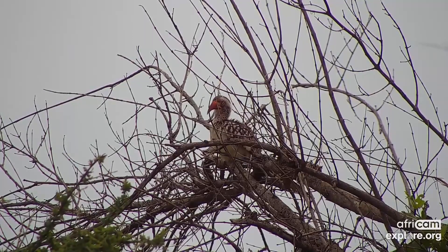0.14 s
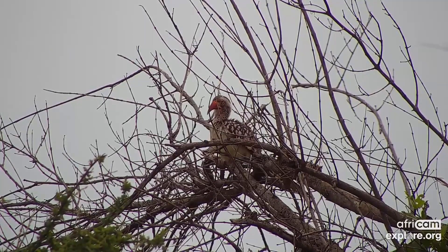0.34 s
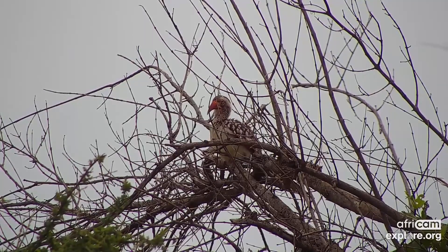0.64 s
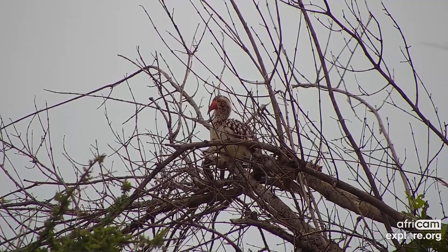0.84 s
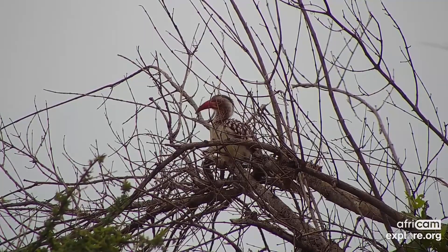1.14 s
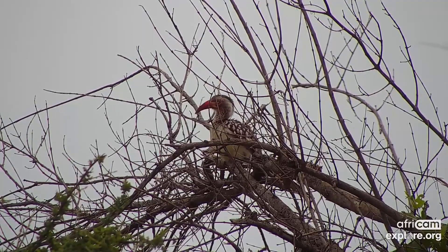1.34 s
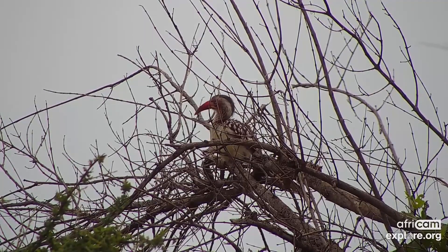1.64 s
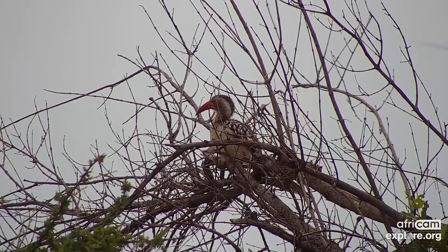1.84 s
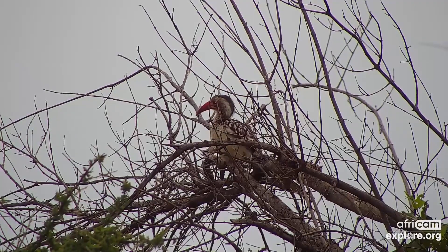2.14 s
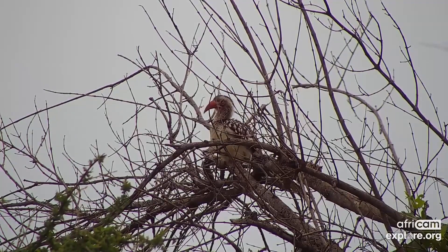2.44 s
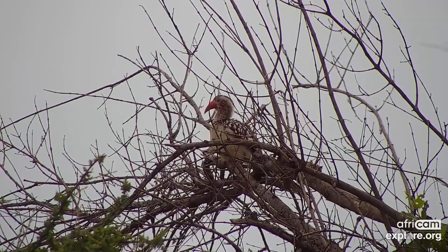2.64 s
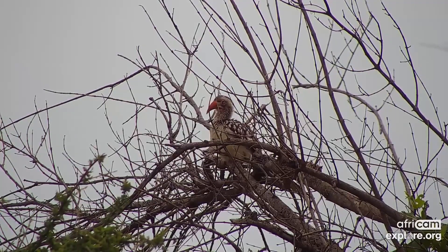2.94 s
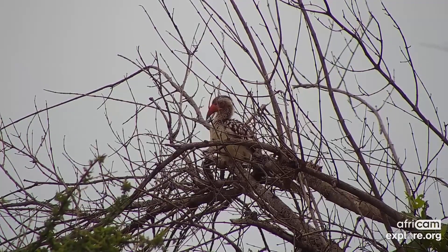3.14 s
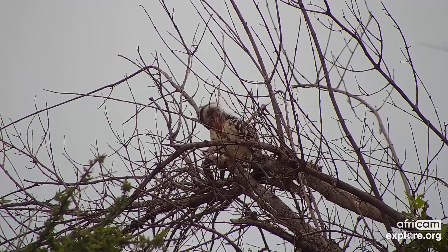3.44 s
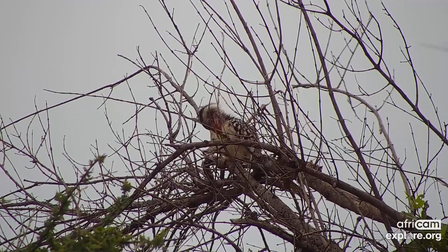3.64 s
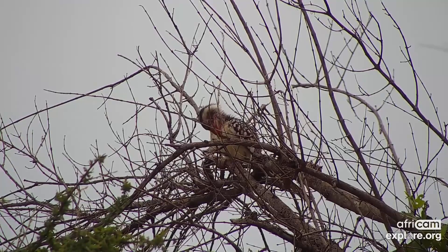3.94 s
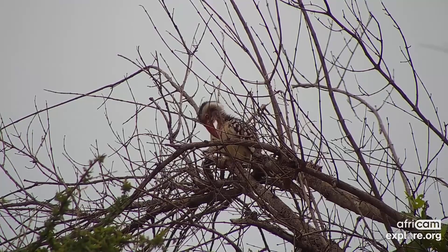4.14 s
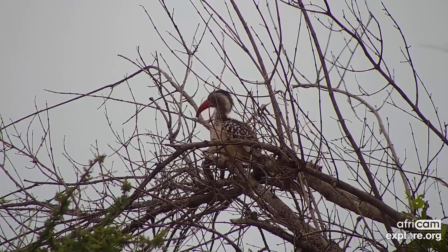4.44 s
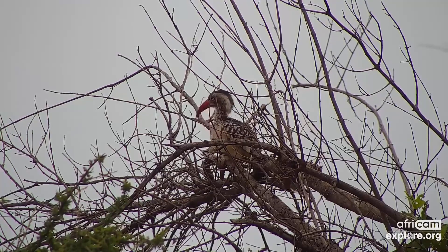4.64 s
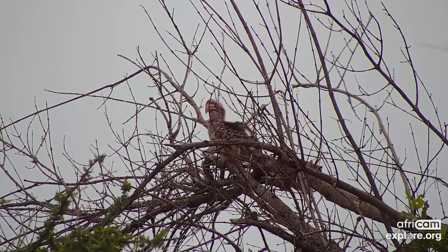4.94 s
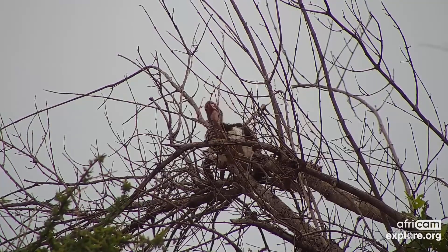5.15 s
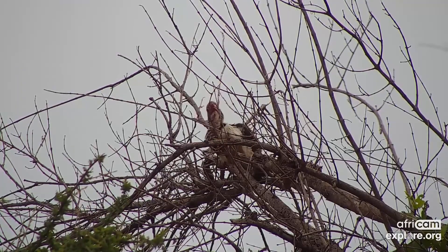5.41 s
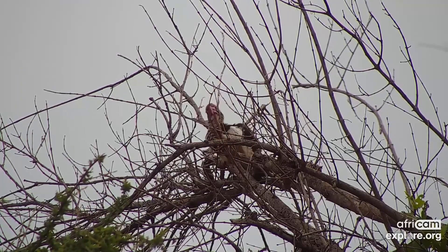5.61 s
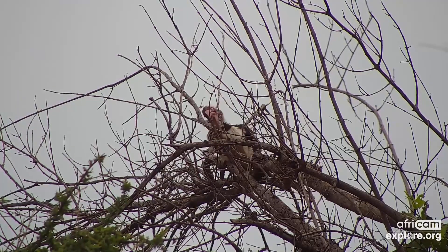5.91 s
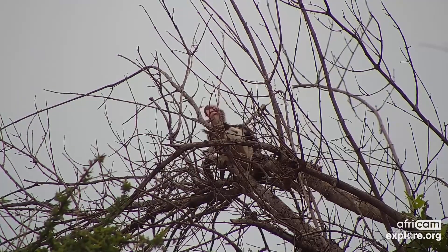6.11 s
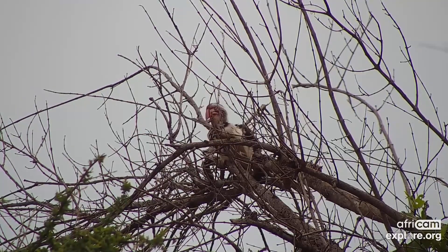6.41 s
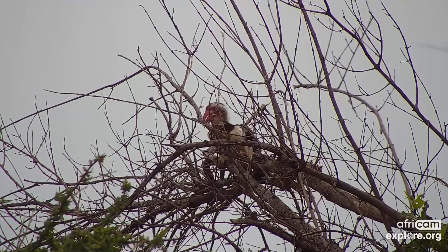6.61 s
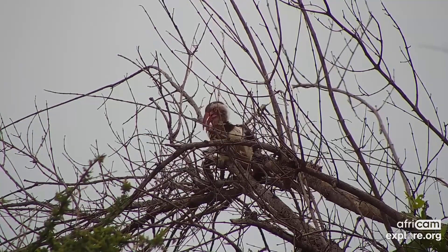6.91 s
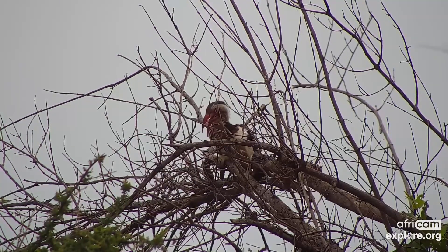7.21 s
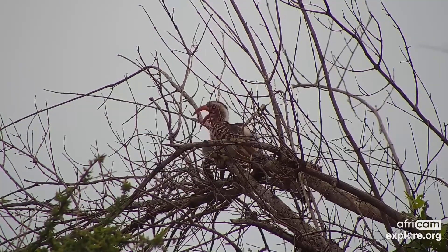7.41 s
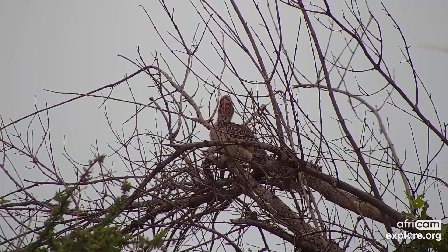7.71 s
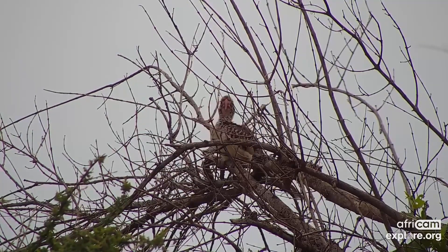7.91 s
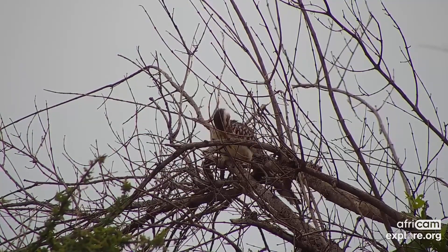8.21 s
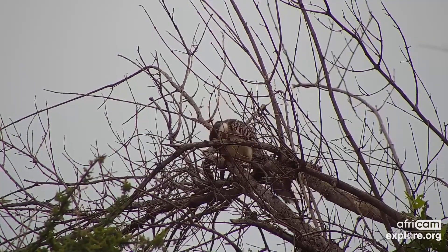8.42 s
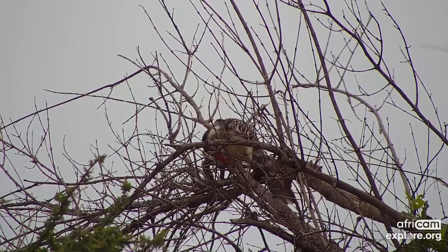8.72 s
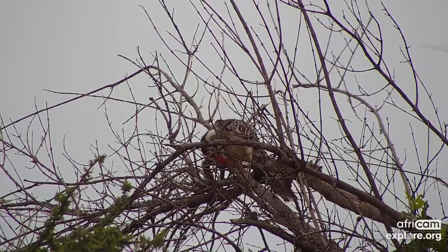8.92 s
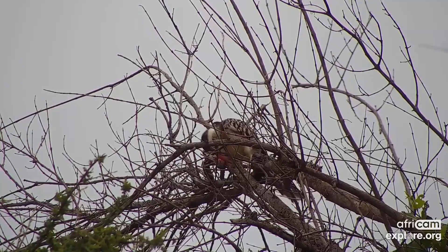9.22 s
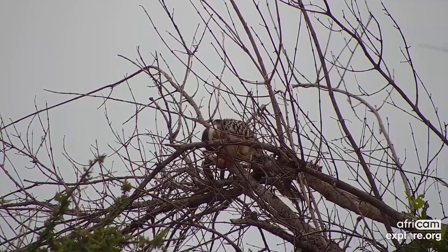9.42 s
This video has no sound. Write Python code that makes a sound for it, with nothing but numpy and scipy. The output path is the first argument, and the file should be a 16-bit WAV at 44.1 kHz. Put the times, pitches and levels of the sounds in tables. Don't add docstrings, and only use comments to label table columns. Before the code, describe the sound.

A fixed outdoor microphone catches a hornbill nearby, its four short whistles climbing sharply and ending in raspy air. It falls silent after about two seconds. Distant songbirds continue to the end with thin whistles, chips, dry descending ticks in trills, and buzzing notes, lightly echoed by branches. Behind everything lie a constant pulsing engine drone, low rumble, a faint frog and insect murmur, and watery hiss.

```python
import sys
import numpy as np
from scipy import signal
from scipy.fft import rfft, irfft, next_fast_len
from scipy.io import wavfile

SR = 44100
rng = np.random.default_rng(int(sys.argv[2]) if len(sys.argv) > 2 else 0)


def persist_wave(psi):
    counts = np.round(np.clip(psi, -1, 1) * 32767).astype(np.int16)
    wavfile.write(sys.argv[1], SR, np.atleast_2d(counts).T)


def natural_amplitude(level_db):
    exponent = np.asarray(level_db, float) / 20
    return 10 ** exponent


N = 421596


def evened(x):
    return x / np.sqrt(np.mean(x ** 2) + 1e-20)


def read(points, hz):
    f, value = np.transpose(points)
    return np.interp(np.log(hz + 1), np.log(f + 1), value)


def add(mix, s, sound):
    at = round(s * SR)
    sound = sound[max(-at, 0):]
    part = mix[max(at, 0):][:len(sound)]
    part += sound[:len(part)]


def resonate(x, hz, width):
    turn = np.exp(2j * np.pi * np.cumsum(hz * np.ones(len(x))) / SR)
    r = np.exp(-np.pi * width / SR)
    smoothed = signal.lfilter([(1 - r) ** 2], [1, -2 * r, r * r], x / turn)
    return 2 * (turn * smoothed).real


def wander(length, hz):
    drift = signal.lfilter(*signal.butter(2, hz, fs=SR), rng.standard_normal(length + SR))
    return evened(drift[SR:])


def coloured(spectrum):
    size = next_fast_len(N)
    colour = natural_amplitude(read(spectrum, np.fft.rfftfreq(size, 1 / SR)))
    return evened(irfft(rfft(rng.standard_normal(size)) * colour, size)[:N])


def bush(x, t60):
    t = np.arange(round(t60 * SR)) / SR
    struck = (rng.random(len(t)) < .05) * (t > .012)
    taps = rng.standard_normal(len(t)) * struck * natural_amplitude(-60 * t / t60)
    return signal.fftconvolve(x, taps / np.linalg.norm(taps))[:N]


# time in seconds, level in dB.
WASH_LEVEL = [(2.1, -54.5), (2.39, -54.5), (3.78, -55), (4.01, -55.5), (5.51, -52.5), (6.3, -53.5),
              (7.54, -54.5), (7.73, -53), (8.44, -53.5), (9.1, -51.5), (9.56, -53.5)]
# frequency in Hz, density in dB per Hz.
HISS_COLOUR = [(200, -20), (330, 8.5), (450, 10.5), (650, 3.5), (1000, -0.5), (2500, -5), (3300, 3),
               (4000, -7), (5500, -15), (7000, -10), (9000, -5), (11000, -24), (14000, -8.5)]
# frequency in Hz, density in dB per Hz.
WATER_COLOUR = [(600, -30), (800, -8.5), (1000, -1), (1300, -1), (1600, 2), (1750, -4), (2100, -5),
                (2600, -7.5), (3300, -14.5), (4200, -37)]


def air():
    s, db = np.transpose(WASH_LEVEL)
    swell = natural_amplitude(np.interp(np.arange(N) / SR, s, db) - 0.5 + 0.44 * wander(N, 20))
    hiss_db = -62 + .3 * wander(N, 8)
    return natural_amplitude(hiss_db) * coloured(HISS_COLOUR) + swell * coloured(WATER_COLOUR)


# multiple of the shaft rate,
# level in dB, level below in dB, level above in dB, first swell below in seconds, first swell above in seconds.
ENGINE_ORDERS = [(6, -39.8, -54, -45, .054, .033), (7, -42.2, -64, -55, .1, .109),
                 (9, -61, -72, -65, 0, .06), (12, -51.6, -53, -62, .069, .043),
                 (16, -70, -65, -77, 0, .106), (18, -74, -90, -81, 0, 0), (19, -75, -82, -88, 0, 0),
                 (24, -70.5, -72.5, -76, .099, .038)]
# frequency in Hz, density in dB per Hz.
RUMBLE_COLOUR = [(20, -45), (32, -21), (45, -6.5), (55, 2), (90, -0.5), (105, -6), (140, -4.5), (180, -3.5),
                 (200, -11.5), (225, -19.5), (265, -20.5), (340, -21.5), (500, -41)]


def machines():
    shaft_hz, stroke_s, wobble_hz = 12.5163, .0495, 7.0508
    t = np.arange(N) / SR
    tones = 0
    for k, db, below_db, above_db, below_s, above_s in ENGINE_ORDERS:
        below = natural_amplitude(below_db) * np.exp(-2j * np.pi * wobble_hz * (t - below_s))
        above = natural_amplitude(above_db) * np.exp(2j * np.pi * wobble_hz * (t - above_s))
        sign = 1 if k < 12 else -1
        turning = np.exp(2j * np.pi * k * shaft_hz * (t - stroke_s))
        tones = tones + sign * ((natural_amplitude(db) + below + above) * turning).real
    return np.sqrt(2) * tones + natural_amplitude(-42) * coloured(RUMBLE_COLOUR)


# pitch in Hz, width in Hz, level in dB.
CHORUS_VOICES = [(667.5, 48, -78), (1107, 33, -69.5), (1208, 59, -66.5), (1339, 120, -68.5),
                 (1588, 91, -64.5), (1790, 44, -68), (1868, 51, -72), (1992, 100, -71), (2342, 150, -71),
                 (4730, 1700, -71.5)]


def chorus():
    total = 0
    for hz, width, db in CHORUS_VOICES:
        spells = natural_amplitude(db + 3.66 * wander(N, 6.7))
        total = total + spells * evened(resonate(rng.standard_normal(N), hz, width))
    return total


# start in seconds, length in seconds, start pitch in Hz, end pitch in Hz, level in dB.
BUZZY_CALLS = [(2.97, 0.2, 3250, 3350, -63), (3.0, 0.31, 3100, 5900, -58.5), (4.569, .25, 3120, 3020, -62),
               (6.1, 0.11, 3270, 3350, -57), (6.25, .15, 3150, 3600, -60), (6.934, 0.092, 3150, 3200, -58),
               (7.16, 0.064, 3320, 3450, -59.5), (7.7, .22, 3240, 3500, -63),
               (8.028, 0.15, 3350, 4800, -63.5), (8.577, .32, 3000, 4800, -64.5),
               (8.969, 0.49, 3160, 2700, -60.5)]


def buzz(s, length, start_hz, end_hz, db):
    t = np.arange(s, s + length, 1 / SR)
    u = (t - s) / length
    count = np.floor(135 * t + .04 * wander(len(t), 60))
    pulses = np.diff(count, prepend=np.floor(135 * t[0])) > 0
    drive = pulses * rng.uniform(.75, 1, len(t)) + .015 * rng.standard_normal(len(t))
    hz = start_hz + (end_hz - start_hz) * u ** 2.7
    ring = resonate(drive, hz, 720 + 0.15 * abs(end_hz - start_hz))
    edge_db = -4.5 * (2 * u ** 1.4 - 1) ** 2
    return s, natural_amplitude(db + edge_db) * evened(ring)


def tick(s, db, length=.024):
    u = np.linspace(-1, 1, round(length * SR))
    hz = (4950 - 600 * u) * rng.uniform(.99, 1.01)
    return s - length / 2, natural_amplitude(db) * np.hanning(len(u)) * np.sin(2 * np.pi * np.cumsum(hz) / SR)


# start in seconds, length in seconds, level in dB.
TRILL_RUNS = [(-.185, .3, -53), (0.945, .3, -55), (1.64, .13, -60), (1.909, .3, -57), (2.328, .3, -62),
              (2.762, .3, -56.5), (3.414, .25, -63), (3.726, .3, -57.5), (3.902, .3, -68),
              (4.328, .25, -64), (4.605, .3, -57), (5.111, .3, -57.5), (5.54, .21, -57), (5.766, .25, -59),
              (6.097, .09, -58), (6.321, .09, -61), (6.426, .26, -60), (6.485, .26, -65), (6.68, .16, -60),
              (7.17, .25, -59), (7.398, .3, -56.5), (7.83, .3, -58.5), (8.45, .3, -58.5), (8.63, .25, -62),
              (9.467, .09, -56)]


def trills():
    k = np.arange(8)
    gaps = .049 - .019 * .7 ** k
    at = np.r_[0, np.cumsum(gaps)[:-1]]
    ticks = []
    for s, span, db in TRILL_RUNS:
        soft_db = -5.5 * 0.31 ** k + 1.5 * rng.standard_normal(len(k))
        ticks += [(s + a, db + soft) for a, soft in zip(at, soft_db) if a < span and s + a > -.01]
    return ticks


def note(s, length, start_hz, middle_hz, end_hz, db, flutter=.12):
    u = np.linspace(-1, 1, round(length * SR))
    bend = (end_hz + start_hz) / 2 - middle_hz
    hz = middle_hz + (end_hz - start_hz) / 2 * u + bend * u ** 2
    shape = signal.windows.tukey(len(u), .3) * (1 + flutter * wander(len(u), 110))
    hz += 70 * flutter * wander(len(u), 120)
    return s, np.sqrt(2) * natural_amplitude(db) * shape * np.sin(2 * np.pi * np.cumsum(hz) / SR)


# time into the phrase in seconds, length in seconds, pitch in Hz, fall in Hz, level in dB.
PHRASE_NOTES = [(0, 0.063, 3020, 292, 0.5), (0.066, .014, 2980, 40, -7), (0.102, 0.027, 3090, 60, -6),
                (.148, 0.041, 2924, 180, 0.5), (.245, 0.035, 2960, 40, -7), (.294, .032, 2830, 170, -4),
                (.345, .04, 2870, 70, -11)]
# start in seconds, length in seconds, level in dB.
PHRASES_SUNG = [(1.198, .4, -52.5), (2.963, .4, -50.5), (4.574, .4, -52), (6.116, .33, -53),
                (7.631, .33, -53), (9.023, .2, -53.5)]
# start in seconds, length in seconds, top pitch in Hz, level in dB.
ARCHED_WHISTLES = [(.75, .17, 3290, -67), (1.218, 0.111, 3290, -56), (1.629, .09, 3200, -65),
                   (3.848, 0.1, 3310, -61), (4.264, 0.11, 3310, -65), (7.32, .07, 3180, -68),
                   (7.398, 0.12, 3340, -61), (7.612, .06, 3350, -60), (7.75, .06, 3380, -62),
                   (8.032, .03, 3400, -59), (9.04, .075, 3290, -52)]
# start in seconds, length in seconds, pitch in Hz, level in dB.
LEVEL_WHISTLES = [(.382, .025, 3600, -65.5), (3.47, .074, 1790, -59), (7.29, .06, 2000, -61),
                  (7.596, 0.064, 1665, -54.5), (7.678, 0.064, 1960, -58), (7.69, .043, 3930, -68),
                  (8.092, 0.06, 1780, -56.4), (8.36, .061, 2010, -61), (8.927, 0.088, 1980, -61),
                  (9.246, 0.048, 1900, -52), (9.31, .073, 1800, -56), (9.44, .04, 1996, -60),
                  (9.51, 0.042, 3150, -62)]
# start in seconds, length in seconds, middle pitch in Hz, level in dB.
FALLING_CHIPS = [(2.18, .02, 3950, -65), (2.375, .022, 4030, -62), (2.805, .015, 3700, -68.5),
                 (2.82, .025, 3820, -68), (3.43, .027, 3950, -68), (4.13, .03, 4620, -67.6),
                 (5.31, 0.036, 3760, -62.3), (6.06, .035, 3040, -59), (6.074, .03, 2550, -61),
                 (6.223, .03, 3360, -63), (7.148, .025, 3310, -57), (7.38, 0.025, 2950, -60),
                 (8.62, .04, 3060, -62), (8.67, 0.031, 3150, -60)]
# start in seconds, length in seconds, start pitch in Hz, end pitch in Hz, level in dB.
QUICK_SLIDES = [(.076, .085, 3080, 2670, -59), (.145, .09, 2680, 2635, -55), (4.673, .017, 5250, 5500, -64),
                (4.693, .02, 3950, 4230, -60), (4.78, .048, 4600, 4380, -58)]
LATE_DROOPS = [(.899, .065, 3760, 3350, -68), (1.7, .08, 3250, 2950, -63), (2.437, .078, 3080, 2920, -62),
               (2.663, .13, 4300, 3450, -62.5), (4.708, .045, 4220, 4080, -57),
               (6.013, .042, 3700, 3420, -60), (6.995, .085, 3320, 2980, -56),
               (9.431, .088, 3920, 3470, -61)]


def songbirds():
    notes = []
    for s, span, db in PHRASES_SUNG:
        for at, length, hz, fall, note_db in PHRASE_NOTES:
            if at < span:
                notes.append((s + at, length, hz + fall / 2, hz, hz - fall / 2, db + note_db, .34))
    for s, length, hz, db in ARCHED_WHISTLES:
        notes.append((s, length, hz * .96, hz, hz * .96, db))
    for s, length, hz, db in LEVEL_WHISTLES:
        notes.append((s, length, hz * 1.025, hz, hz * 1.005, db))
    for s, length, hz, db in FALLING_CHIPS:
        fall = 0.184 * (hz - 2260)
        notes.append((s, length, hz + fall, hz, hz - fall, db))
    for rows, done in ((QUICK_SLIDES, .82), (LATE_DROOPS, .25)):
        notes += [(s, length, a, a + done * (b - a), b, db) for s, length, a, b, db in rows]
    return notes


# start of the falling lead-in in seconds, onset of the whistle in
# seconds, its top in seconds, its end in seconds, level at the top in dB.
CALL_MOMENTS = [
    (-.25, -.17, 0.051, 0.093, -35),
    (.398, .478, .668, 0.72, -37.5),
    (1.031, 1.099, 1.314, 1.368, -35.5),
    (1.708, 1.794, 1.998, 2.057, -36),
]
# lead-in under the top in dB, raise of the whistle's start in Hz, high rasp over rasp effort in dB.
CALL_TEMPER = [
    (-12, 0.5, -5.5),
    (-14, 54, -6.5),
    (-11, 5, -7),
    (-11.5, -10, -2.5),
]
# stage (0 onset, 1 top, 2 end), pitch in Hz, whistle level in dB, rasp effort in dB.
WHISTLE_SHAPE = [
    (0, 1305, -8, -55),
    (.15, 1355, -12, -53.5),
    (.45, 1390, -5, -52.5),
    (.65, 1480, -4, -48),
    (1.0, 1603, -0.5, -46.5),
    (1.45, 1514, -5, -46),
    (1.8, 1587, -17, -52),
    (2.0, 1490, -30, -68),
]


def gesture(start, onset, top, end, db, lead_db, raise_hz, high_db):
    stage, hz, whistle_db, rasp_db = np.transpose(WHISTLE_SHAPE)
    hz = hz + raise_hz * np.clip(1 - stage, 0, 1)
    rise_s, lead_s, lead_top_hz, lead_fall_hz = 0.013, 0.0449, 1460, 271
    pause = onset - .008 - start - lead_s
    lead_at = start + np.array([0, rise_s, lead_s, lead_s + pause])
    lead_hz = [lead_top_hz, lead_top_hz - lead_fall_hz * rise_s / lead_s,
               lead_top_hz - lead_fall_hz + raise_hz, hz[0] - 30]
    fade_db = -14 * (pause / .03) ** 2
    lead_db = lead_db + np.array([-14, 0, -5, -4 + fade_db])
    s = np.r_[lead_at, np.interp(stage, [0, 1, 2], [onset, top, end])]
    rasp_db = np.r_[-66 + np.array([-9, -2, 0, 5]), rasp_db]
    high_db = rasp_db + high_db - 4.5 * np.clip((s - top) / (end - top), -.4, 1)
    through = np.clip((s - onset) / (end - onset), 0, 1)
    high_hz = 4723 - 606 * through - 3.8 * raise_hz * (1 - through)
    return np.transpose([s, np.r_[lead_hz, hz], db + np.r_[lead_db, whistle_db], rasp_db, high_db, high_hz])


# time of one burst in seconds, bursts per second, time in seconds where
# the rattle smears into a hiss, time in seconds of a catch in the whistle.
THROAT_RATTLE = [
    (0.019, 61, 0.058, 0.048),
    (0.574, 50, 0.66, 0.65),
    (1.247, 48, 1.257, 1.259),
    (1.912, 49.5, 1.975, 1.775),
]
# frequency in Hz, width in Hz, level in dB.
LOW_THROAT = [(2050, 770, 10), (2450, 130, -7.5), (3150, 260, -5)]


def hornbill(rows, rattle):
    s, *columns = np.transpose(rows)
    t = np.arange(s[0], s[-1], 1 / SR)
    hz, whistle_db, low_db, high_db, high_hz = (np.interp(t, s, c) for c in columns)
    at, rate, smear, catch = rattle
    phase = 2 * np.pi * ((t - at) * rate + .03 * wander(len(t), 15))
    burst = np.exp(2.3 * (np.cos(phase) - 1))
    hiss = np.clip((t - smear) / 0.044, 0, 1)
    breath, whisper = rng.standard_normal((len(t), 2)).T
    peak = np.diff(np.sign(np.diff(burst, prepend=0)), prepend=0) < 0
    snap = 7 * peak * rng.uniform(.75, 1, len(t))

    drive = breath * (burst + .3 + .8 * hiss) + 1.2 * snap
    low = sum(natural_amplitude(db) * evened(resonate(drive, f, width)) for f, width, db in LOW_THROAT)

    drive = whisper * (burst + .55 + .6 * hiss) + .9 * snap
    high = 0
    for shift in (-150, 130):
        high = high + resonate(resonate(drive, high_hz + shift, 420), high_hz + shift, 700)

    flip = np.tanh((t - catch) / 0.0022)
    sway = .9 + .55 * burst + .2 * wander(len(t), 90)
    tone = np.sin(2 * np.pi * np.cumsum(hz + 10 * wander(len(t), 41)) / SR)
    whistle = np.sqrt(2) * flip * sway * tone
    whistle += (.17 + .4 * hiss) * evened(resonate(resonate(breath, hz, 450), hz, 450))
    return s[0], natural_amplitude(whistle_db) * whistle + natural_amplitude(low_db) * evened(low) + natural_amplitude(high_db) * evened(high)


def scene():
    near, far, buzzing, ticks = np.zeros((4, N))
    for row in BUZZY_CALLS:
        add(buzzing, *buzz(*row))
    for row in trills():
        add(ticks, *tick(*row))
    for row in songbirds():
        add(far, *note(*row))
    for moments, temper, rattle in zip(CALL_MOMENTS, CALL_TEMPER, THROAT_RATTLE):
        add(near, *hornbill(gesture(*moments, *temper), rattle))
    buzzing = buzzing + natural_amplitude(-9) * bush(buzzing, .3)
    ticks = natural_amplitude(-2) * ticks + natural_amplitude(-4.5) * bush(ticks, .3)
    far = far + natural_amplitude(-7) * bush(far, .4)
    near = near + natural_amplitude(-14) * bush(near, .25)
    return (air() + machines() + chorus() + buzzing + ticks + far + near)[None]


def band_limit(x):
    return signal.sosfilt(signal.butter(12, 11440, fs=SR, output="sos"), x)


def record(dry):
    edge = signal.firwin(1023, 11120, window=("kaiser", 9), fs=SR)
    mix = signal.oaconvolve(dry, edge[None], "same")
    return band_limit(mix)


dry = scene()
out = record(dry)
persist_wave(out)
```